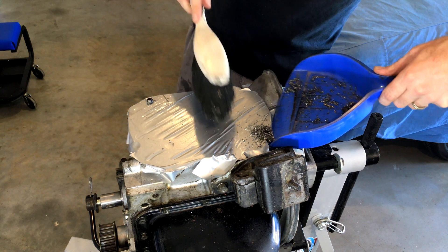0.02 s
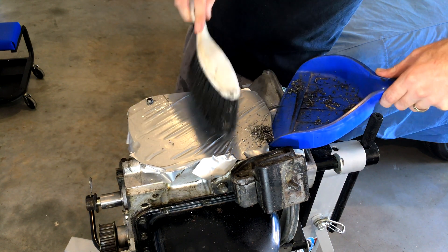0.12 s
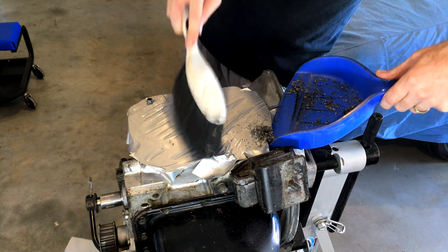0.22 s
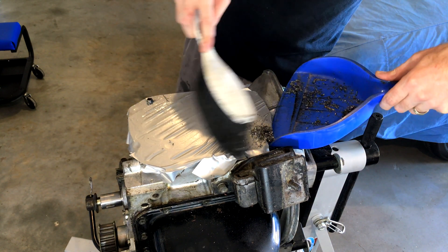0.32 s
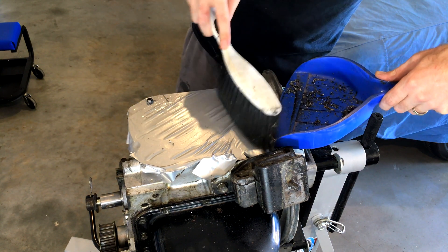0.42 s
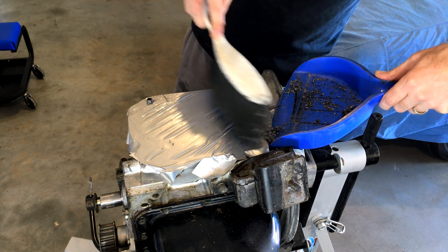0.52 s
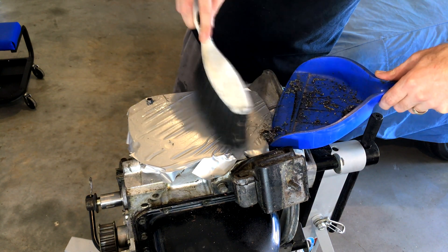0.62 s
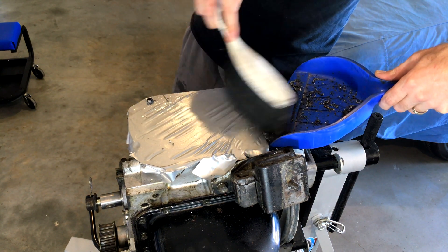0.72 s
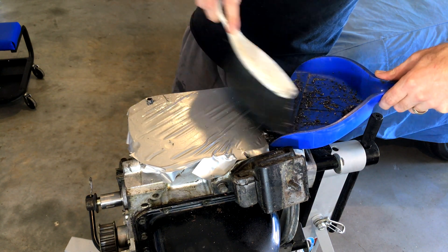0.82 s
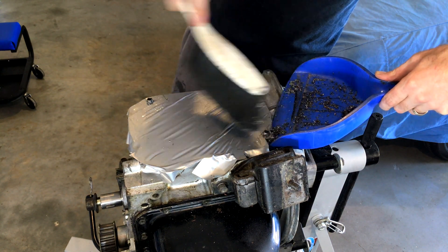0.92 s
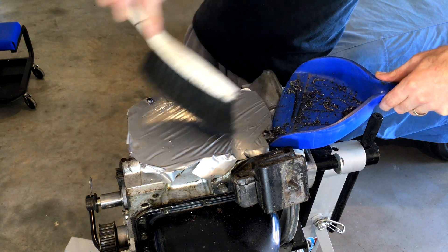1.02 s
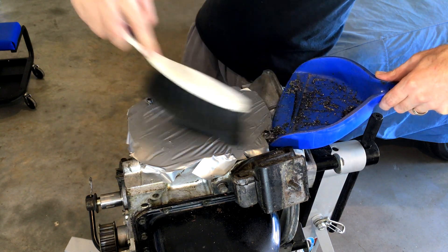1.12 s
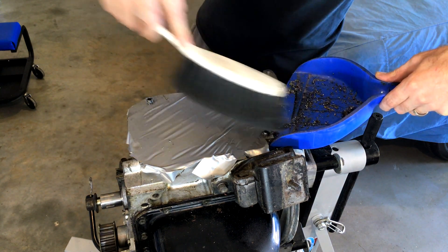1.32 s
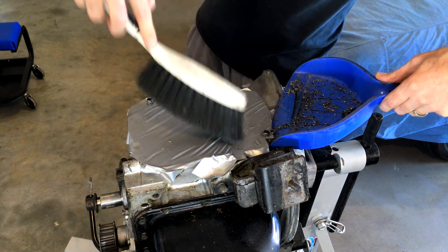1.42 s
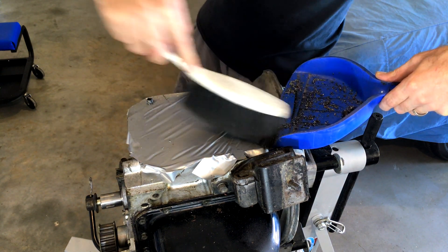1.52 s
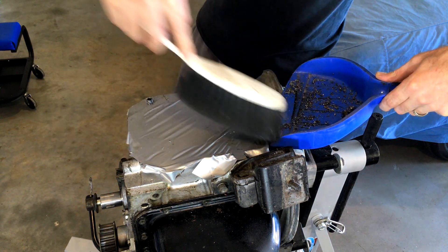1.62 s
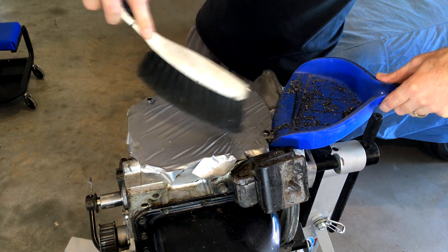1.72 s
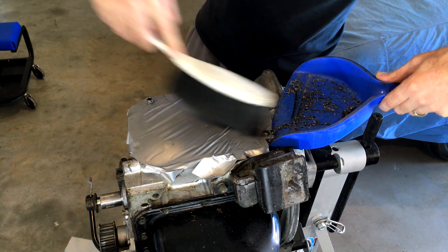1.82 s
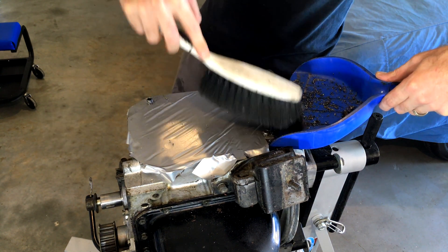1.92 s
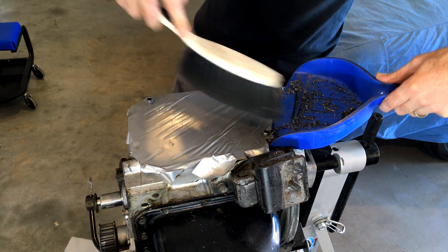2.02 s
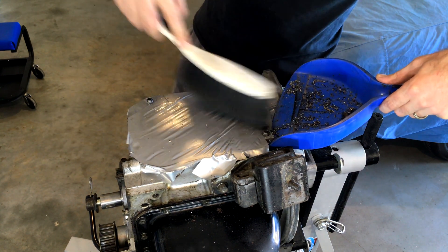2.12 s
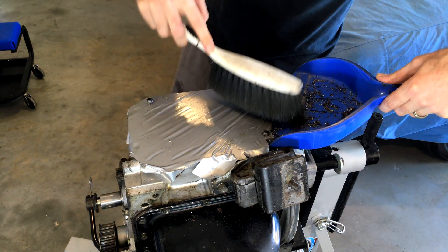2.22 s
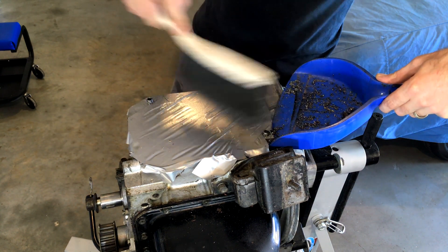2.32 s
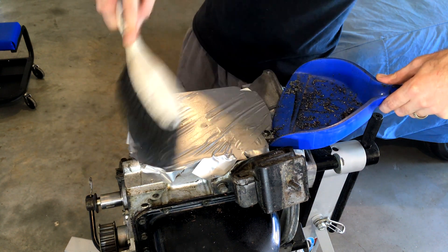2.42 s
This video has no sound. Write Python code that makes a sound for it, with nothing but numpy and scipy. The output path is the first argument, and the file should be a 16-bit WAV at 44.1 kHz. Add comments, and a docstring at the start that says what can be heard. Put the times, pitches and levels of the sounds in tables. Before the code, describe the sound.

A hand brush sweeps metal shavings off a taped-over engine part in short scratchy strokes. The bristles land with soft knocks, and shavings tick into a plastic dustpan after the strokes, heard close in a quiet garage.

```python
"""A hand brush sweeps metal shavings off a taped-over engine part into a plastic dustpan.
Over the steady rumble of a quiet garage, the tufts first judder on the taut cover by stick-slip friction
and their tips graze it. Stroke after stroke then scratches across, with soft knocks where the tufts land;
the part rings in its modes. Flicked shavings follow, ticking into the pan, and the last of them end
the sweeping. A short diffuse echo trails each sound."""
import sys
import numpy as np
from scipy import signal
from scipy.fft import rfft, irfft
from scipy.io import wavfile

SR = 44100
rng = np.random.default_rng(int(sys.argv[2]) if len(sys.argv) > 2 else 0)


def waveform_to_disk(signal):
    """Save audio, clipped to [-1, 1], as 16-bit WAV at the path in sys.argv[1]."""
    frames = np.transpose(np.atleast_2d(signal))
    scaled = np.clip(frames, -1, 1) * 32767
    samples = np.round(scaled).astype(np.int16)
    wavfile.write(sys.argv[1], SR, samples)


N = 108045
TIME = np.arange(N) / SR


def undb(db):
    """Amplitude ratio of a level in decibels."""
    return 10 ** (np.asarray(db) / 20)


def unit(x):
    """Normalisation to rms 1."""
    return x / np.sqrt(np.mean(x ** 2) + 1e-24)


def colour(x, spectrum, spot_hz=0., width_hz=183, bright_db=0., size=2048):
    """Minimum-phase filter through (f/Hz, level/dB) points, with optional resonance and treble shelf."""
    shelf_hz, spot_db = 5860, 9.5
    f = np.maximum(np.fft.rfftfreq(size, 1 / SR), 1)
    hz, db = np.array(spectrum).T
    shelf_db = bright_db / (1 + (shelf_hz / f) ** 2)
    gain = undb(np.interp(np.log(f), np.log(hz), db) + shelf_db)
    if spot_hz:
        gain = gain + undb(spot_db) / (1 + (2 * (f - spot_hz) / width_hz) ** 2)
    cepstrum = irfft(np.log(gain))
    cepstrum[1:size // 2] *= 2  # folding the cepstrum makes the filter causal
    cepstrum[size // 2 + 1:] = 0
    response = irfft(np.exp(rfft(cepstrum)))
    return signal.oaconvolve(x, response)[:len(x)]


def grains(per_s, spread_db, count=N):
    """Shot noise: independent impulses of uneven size, rms 1."""
    chance, size, sign = rng.random(count), rng.standard_normal(count), rng.choice([-1, 1], count)
    return unit((chance < per_s / SR) * sign * undb(spread_db * np.minimum(size, 2)))


def touch(start, attack_s=0.0024):
    """Onset of contact: a linear rise from 0 to 1."""
    return np.clip((TIME - start) / attack_s, 0, 1)


def add(out, start, x, db, length):
    """Equal energy: mix in a transient with the energy of that level held for that length."""
    i = max(int(start * SR), 0)
    x = x * undb(db) * np.sqrt(length * SR / np.sum(x ** 2))
    out[i:i + len(x)] += x[:N - i]


def ring(x, modes):
    """Modal superposition: the excitation plus the response of one damped oscillator per mode."""
    out = np.zeros(N)
    for hz, t60, db in modes:
        pole = np.exp((2j * np.pi * hz - np.log(1000) / t60) / SR)
        out += undb(db) * 2 * (1 - abs(pole)) * signal.lfilter([1], [1, -pole], x).real
    return x + out


# spectrum of the garage's noise: f/Hz, relative level/dB
GARAGE_SPECTRUM = [(12, -37), (20, 2.5), (252, -10), (1580, -18), (2840, -26), (3960, -26), (4310, -23),
                   (6020, -26.5), (15500, -30)]


def garage(noise_db=-62.5, hum_hz=58.4, hum_db=-76):
    """Stationary noise: broadband rumble and hiss, with a faint pure tone as hum."""
    air = unit(colour(rng.standard_normal(N), GARAGE_SPECTRUM, size=8192))
    hum = unit(np.sin(2 * np.pi * hum_hz * TIME))
    return undb(noise_db) * air + undb(hum_db) * hum


# response of the taut cover: f/Hz, relative level/dB
COVER_SPECTRUM = [(60, -10), (200, -17.5), (330, -7), (480, 2), (800, 3), (1050, -3), (1500, -5.5),
                  (2200, -13.5), (4000, -25), (16000, -28)]
# tufts pressed on the cover: start t/s, lift t/s, first level/dB, last level/dB, decay/(dB/s),
# resonance of the pressed spot f/Hz, bandwidth/Hz
PRESSES = [(0, 0.064, -61, -60.5, 97, 314, 74), (0.26, 0.419, -55.5, -45, 283, 648, 300),
           (0.66, 0.706, -44.5, -43.5, 415, 616, 324), (0.965, 1.071, -71, -53.5, 300, 377, 296),
           (1.113, 1.226, -43.5, -41.5, 405, 618, 57), (1.448, 1.532, -60, -58.5, 212, 463, 310),
           (1.545, 1.594, -56, -58.5, 264, 299, 92), (1.795, 1.84, -44, -43, 270, 730, 400),
           (2.123, 2.126, -36, -41.5, 263, 750, 310)]


def judder():
    """Stick-slip friction: tufts drum on the taut cover while pressed, and it dies away as they lift."""
    out = np.zeros(N)
    for start, lift, first_db, last_db, fade, hz, width_hz in PRESSES:
        db = np.interp(TIME, [start, lift], [first_db, last_db]) - fade * np.maximum(TIME - lift, 0)
        slips = grains(per_s=900, spread_db=1.0)
        steady_rms = np.std(colour(slips, COVER_SPECTRUM, hz, width_hz))
        force = touch(start) * undb(db) * slips
        out += colour(force, COVER_SPECTRUM, hz, width_hz) / steady_rms
    return out


# tips and grit on the cover: middle t/s, level/dB, half duration/s, band centre f/Hz
GRAZES = [(0.068, -69.5, 0.086, 6000), (0.827, -65.5, 0.043, 4750), (1.056, -64, 0.018, 5430),
          (1.53, -51, 0.011, 3700), (1.595, -62, 0.028, 5670), (1.876, -44, 0.0093, 3800),
          (2.17, -48.5, .011, 3630)]


def grazing(width_hz=1140):
    """Narrow-band friction noise: tips and grit graze the cover, higher when barely touching."""
    out = np.zeros(N)
    for middle, db, half_length, hz in GRAZES:
        band = signal.butter(2, [hz - width_hz / 2, hz + width_hz / 2], "bandpass", fs=SR, output="sos")
        level = undb(db) * np.exp(-((TIME - middle) / half_length) ** 2 / 2)
        out += level * unit(signal.sosfilt(band, grains(per_s=3000, spread_db=2)))
    return out


# modes of the covered part: f/Hz, decay time T60/s, gain/dB
PART_MODES = [(345, .3, -4), (484, .15, -5), (621, .26, 1), (815, .22, -1), (970, .15, -6), (1310, .2, -3),
              (1605, .2, -2), (2140, .15, -4), (2300, .18, -4)]


def covered_part(brush):
    """Forced vibration: the brush is heard along with the modes it drives in the part."""
    return ring(brush, PART_MODES)


def reverberation(x, t60_s=0.45, delay_s=0.0077, db=-19):
    """Diffuse field: the garage's echo decays exponentially and is duller than the direct sound."""
    decay = np.exp(-np.log(1000) * TIME / t60_s) * (TIME > delay_s)
    tail = rng.standard_normal(N) * decay
    tail /= np.sqrt(np.sum(tail ** 2))
    dull_tail = colour(tail, [(100, 3), (1500, 1.5), (5000, -9.5), (15000, -52)])
    return undb(db) * signal.fftconvolve(x, dull_tail)[:N]


def sweep(start, fastest, swell_db, fade):
    """Friction noise grows with speed: a stroke's envelope swells, then fades as the brush lifts."""
    early = np.clip((fastest - TIME) / (fastest - start), 0, 1)
    return touch(start) * undb(-swell_db * early ** 2 - fade * np.maximum(TIME - fastest, 0))


# coarse, medium and fine bristle noise: f/Hz, relative level/dB
RASP_SPECTRUM = [(150, -36), (350, -2), (600, -16), (1000, 1), (1300, -1.5), (1600, 0), (1900, -8.5),
                 (2250, -7.5), (2700, -20.5), (5000, -28), (16000, -20.5)]
SCRATCH_SPECTRUM = [(200, -53), (1500, 1), (2600, -7), (3050, 2.5), (3900, 2.5), (4500, 0), (5700, -2),
                    (6300, -8.5), (7200, -34), (12000, -29.5)]
HISS_SPECTRUM = [(500, -35), (4500, -12), (7000, -4), (8200, 1), (10300, -1), (11800, 0), (13000, -.6),
                 (14500, .3), (15700, -2.5)]
# brush movements: start t/s, fastest t/s, scratch level/dB, swell/dB, decay/(dB/s),
# rasp level/dB and hiss level/dB, both relative to the scratch
BRUSH_STROKES = [(0.238, 0.406, -49, 3, 138, 3.5, -8), (0.502, 0.508, -60.5, 2.5, 37, -6, -9),
                 (0.653, 0.693, -53.5, -0.5, 120, 7.5, -9), (1.071, 1.201, -49, 5.5, 187, -2, -4.5),
                 (1.456, 1.523, -51, -1, 198, -3, -2), (1.557, 1.608, -70, 14, 352, 7.5, 1),
                 (1.795, 1.892, -49, 5, 200, -3.5, -3.5), (2.112, 2.178, -49, 19, 232, -2.5, -7.5)]


def bristles(hiss_swell_db=10.5, hiss_lag_s=0.01):
    """Roughness noise: tips snap over shavings and creases, giving rasp, scratch and fine hiss."""
    rasp, scratch, hiss = np.zeros((3, N))
    for start, fastest, db, swell_db, fade, rasp_db, hiss_db in BRUSH_STROKES:
        level = undb(db) * sweep(start, fastest, swell_db, fade)
        scratch += level
        rasp += undb(rasp_db) * level
        # the hiss peaks later, when only the tips still touch
        hiss += undb(db + hiss_db) * sweep(start, fastest + hiss_lag_s, hiss_swell_db, fade)
    return (rasp * unit(colour(grains(per_s=2200, spread_db=1.5), RASP_SPECTRUM))
            + scratch * unit(colour(grains(per_s=5000, spread_db=3.5), SCRATCH_SPECTRUM))
            + hiss * unit(colour(grains(per_s=16000, spread_db=2.5), HISS_SPECTRUM)))


# path of the dip in the brush's treble: t/s, centre f/Hz
TREBLE_DIPS = [(1.08, 14000), (1.16, 12600), (1.52, 12400), (1.57, 9700), (1.8, 12200), (1.89, 9800),
               (2.12, 12600)]


def tilt(x, floor_db=-13, width_hz=1440):
    """Spectral notch: as the brush tilts and travels, a dip shifts through its treble."""
    times, centres = np.array(TREBLE_DIPS).T
    notched = np.zeros(N)
    for share, hz in zip(np.eye(len(times)), centres):
        crossfade = np.interp(TIME, times, share)
        notched += crossfade * signal.lfilter(*signal.iirnotch(hz, hz / width_hz, SR), x)
    return notched + undb(floor_db) * (x - notched)


# brush landing on the cover: t/s, duration/s, thud level/dB, resonance f/Hz, crack level/dB
LANDINGS = [(0.2426, 0.012, -33, 693, -49), (0.564, 0.0046, -51, 510, -68.5),
            (0.6297, 0.013, -32, 628, -53.5), (1.083, 0.015, -45.5, 720, -48),
            (1.222, 0.004, -36, 630, -57), (1.235, 0.0032, -40.5, 645, -54), (1.461, 0.0039, -56, 656, -42),
            (1.49, 0.0023, -38, 572, -60), (1.8, 0.0016, -32, 880, -41.5), (1.829, 0.012, -40, 623, -66),
            (1.843, 0.0055, -34.5, 730, -45.5), (2.118, 0.015, -40, 716, -45.5),
            (2.145, 0.0026, -36, 700, -40.5)]


def knocks(fall_s=0.0056, hiss_db=-15, count=4096):
    """Impact excitation: tufts land within milliseconds, so the cover thuds and the bristles crack."""
    t, out = TIME[:count], np.zeros(N)
    for start, length, thud_db, hz, crack_db in LANDINGS:
        contact = np.exp(-np.maximum(t - length / 2, 0) / fall_s)
        force = contact * grains(per_s=2500, spread_db=2.0, count=count)
        add(out, start, colour(force, COVER_SPECTRUM, hz), thud_db, length)
        snap = contact * grains(per_s=6400, spread_db=6.0, count=count)
        crack = colour(snap, SCRATCH_SPECTRUM) + undb(hiss_db) * colour(snap, HISS_SPECTRUM)
        add(out, start, crack, crack_db, length)
    return out


# firm pushes on the part: t/s, peak level/dB, f/Hz, rise time/s
PUSHES = [(0.245, -53, 87, 0.0081), (1.224, -52.5, 630, 0.03)]


def bumps():
    """Transient resonance: a firm push makes one mode of the part swell and die away."""
    out = np.zeros(N)
    for start, db, hz, rise in PUSHES:
        age = np.maximum(TIME - start, 0)
        envelope = age / rise * np.exp(1 - age / rise)
        out += undb(db) * envelope * np.sin(2 * np.pi * hz * age)
    return out


# response of the plastic pan: f/Hz, relative level/dB
PAN_SPECTRUM = [(150, -25), (600, -10.5), (1000, 0), (1450, 5.5), (2000, -5.5), (2600, -5), (3800, 0.5),
                (5200, -1), (6900, -14.5), (9000, -9.5), (13200, -8.5), (15700, -9)]
# modes of the pan: f/Hz, decay time T60/s, gain/dB
DUSTPAN_MODES = [(1507, 0.051, 0.5), (1730, 0.054, -7), (3850, 0.035, -10), (4900, 0.13, -12)]
# clumps landing in the pan: t/s, level/dB, scatter time/s, treble shelf/dB
CLUMPS = [(0.338, -39, 0.0023, -26), (.498, -42.5, 0.0054, 3), (0.504, -44.5, 0.0088, 2),
          (.522, -38, 0.0011, 4), (.537, -45.5, 0.0016, -20), (0.5457, -42, 0.002, -13),
          (0.567, -45.5, .002, 5), (.577, -54, 0.01, -6), (0.611, -42, 0.00089, 8),
          (0.615, -41.5, 0.0012, 1), (.738, -51, 0.004, -30), (0.7449, -39, 0.0023, -1),
          (0.753, -45, 0.0012, 14), (1.0294, -51.5, 0.0015, 13), (1.268, -48, 0.0013, 11),
          (1.3268, -45.5, 0.00075, 3), (1.364, -50.5, 0.0014, -1), (1.956, -46, 0.0015, -3),
          (1.974, -45.5, 0.00078, -5), (2.009, -50, 0.0024, -8), (2.212, -47, 0.0019, -7),
          (2.288, -50.5, 0.004, -42), (2.306, -53, 0.0037, -8), (2.363, -50, 0.0011, -8),
          (2.4049, -45, 0.00095, -8)]


def shavings(tail_s=0.035, tail_db=-14.5, flight_s=0.076, settle_s=0.056, stray_db=-70, count=4096):
    """Random impacts: clumps of shavings tick and strays patter on the pan, exciting its modes."""
    t, ticks = TIME[:count], np.zeros(N)
    for start, db, scatter, bright_db in CLUMPS:
        envelope = np.exp(-(t / scatter) ** 2 / 2) + undb(tail_db) * np.exp(-t / tail_s)
        impacts = envelope * grains(per_s=13000, spread_db=2, count=count)
        add(ticks, start, colour(impacts, PAN_SPECTRUM, bright_db=bright_db), db, scatter)
    falling = np.zeros(N)
    for _, fastest, *_ in BRUSH_STROKES:  # strays peak one flight time after the brush is fastest
        falling += np.exp(-np.abs(TIME - fastest - flight_s) / settle_s)
    strays = unit(colour(grains(per_s=550, spread_db=4), PAN_SPECTRUM))
    return ring(ticks + undb(stray_db) * falling * strays, DUSTPAN_MODES)


def scene():
    """Superposition: the direct sound of brush, part and pan, its echo and the garage's noise."""
    brush = tilt(bristles() + knocks()) + judder() + grazing()
    direct = covered_part(brush) + bumps() + shavings()
    return (direct + reverberation(direct) + garage())[None]


def record(dry, cutoff_hz=15720):
    """Band limiting: a steep elliptic low-pass removes the highest treble."""
    return signal.sosfilt(signal.ellip(12, .1, 70, cutoff_hz, fs=SR, output="sos"), dry)


dry = scene()
out = record(dry)
waveform_to_disk(out)
```